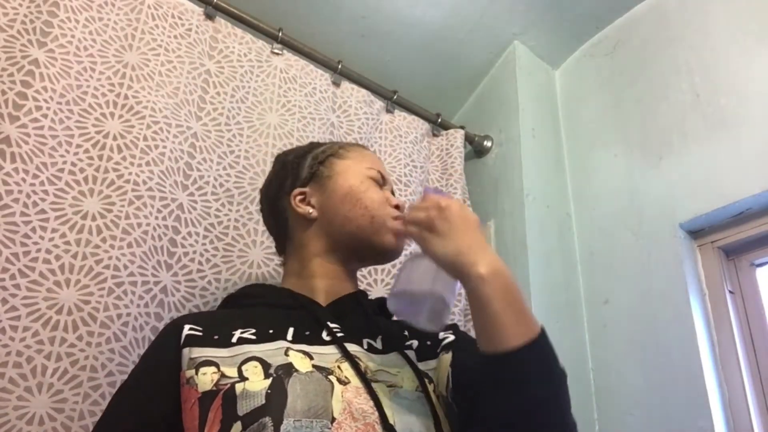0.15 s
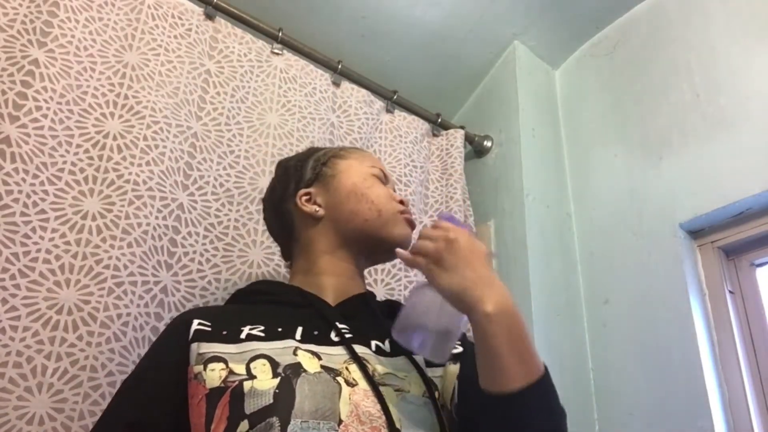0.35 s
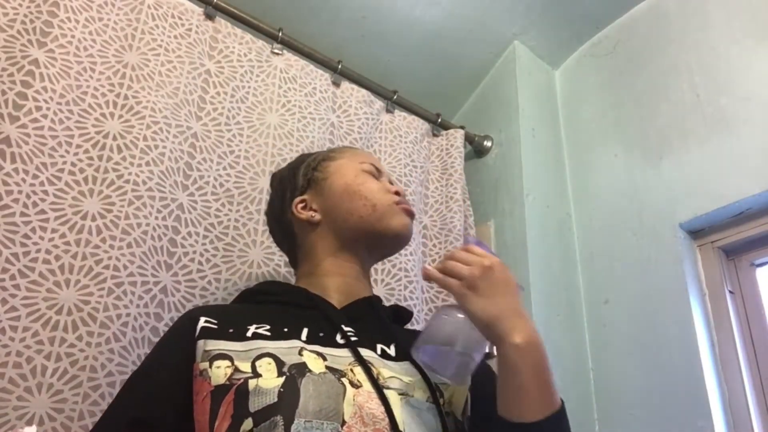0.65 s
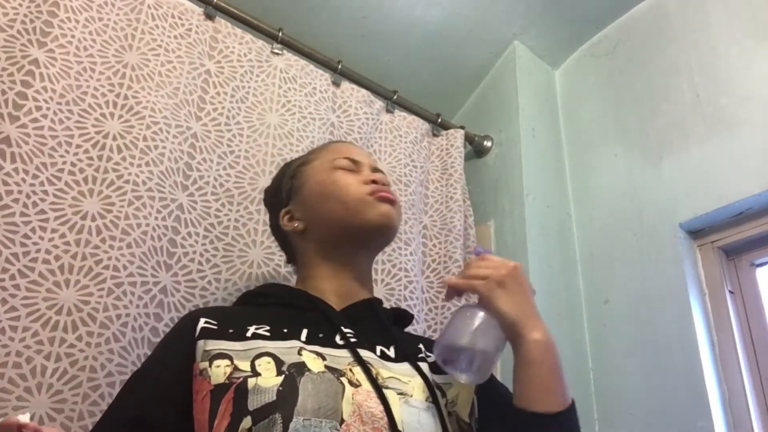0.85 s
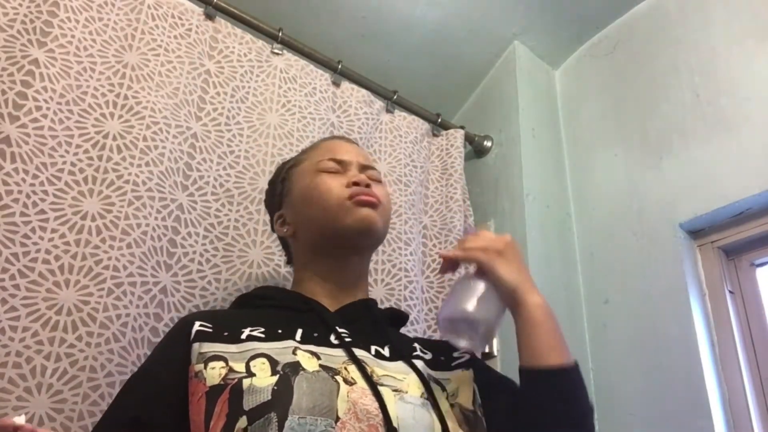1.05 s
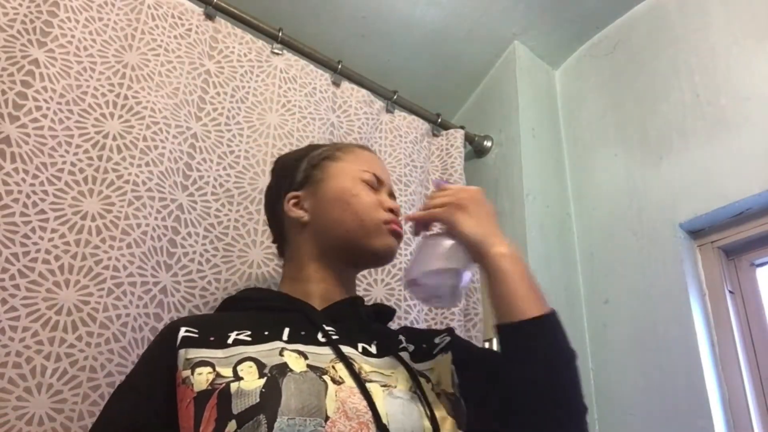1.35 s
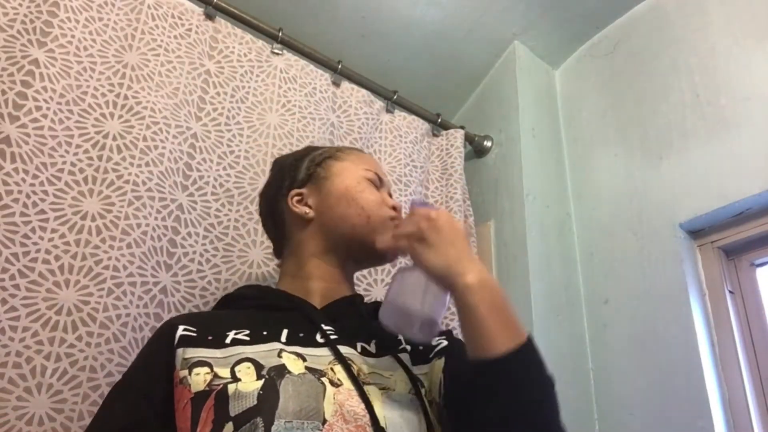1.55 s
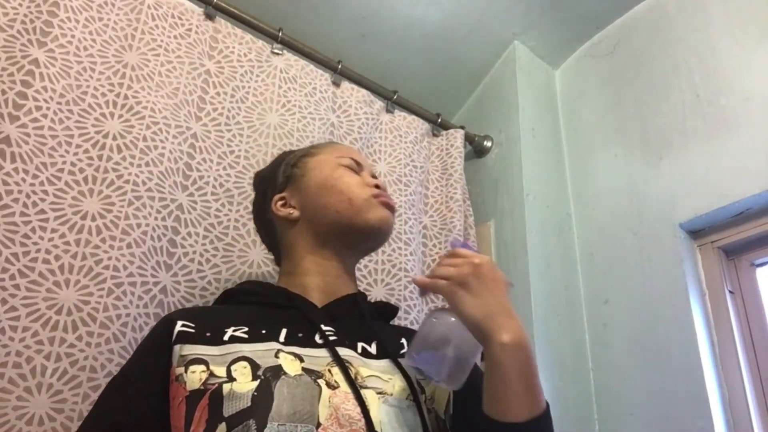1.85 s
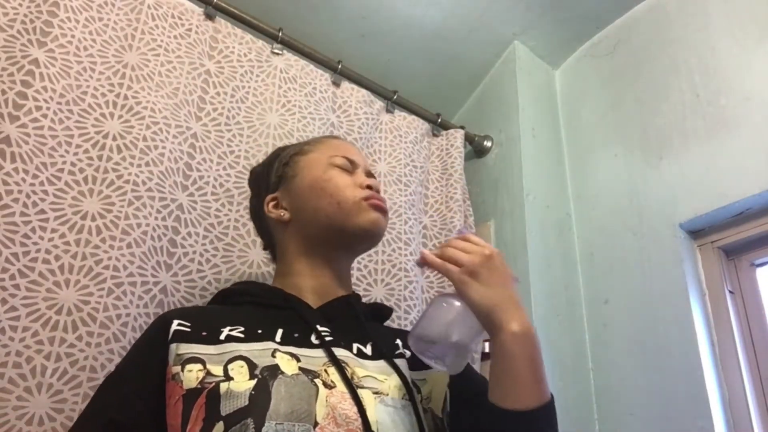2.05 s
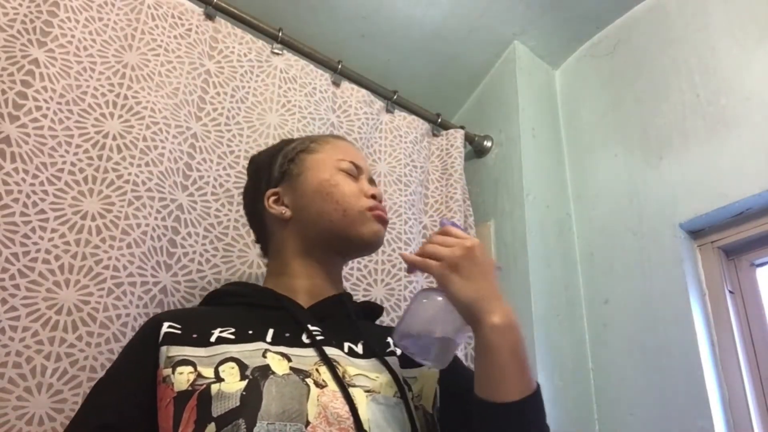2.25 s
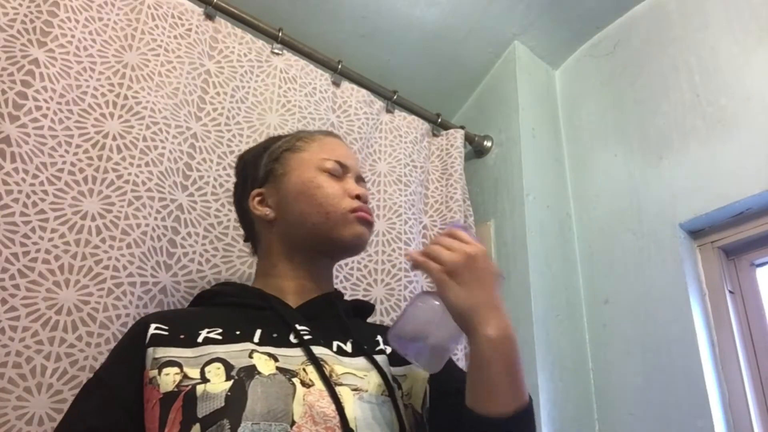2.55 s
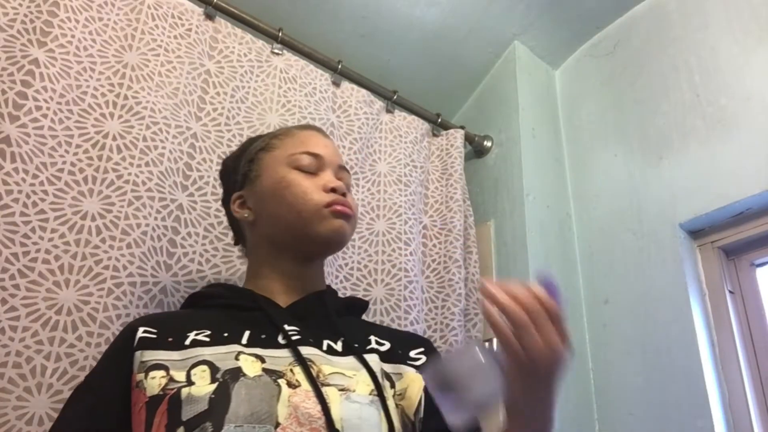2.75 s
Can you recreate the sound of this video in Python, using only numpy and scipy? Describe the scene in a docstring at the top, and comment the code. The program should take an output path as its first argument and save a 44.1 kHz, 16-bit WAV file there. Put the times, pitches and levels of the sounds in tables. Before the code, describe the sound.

Quick hisses of mist from a plastic spray bottle, its pump clacking between presses.

```python
"""A small plastic spray bottle clacks in a bathroom, then is pumped nine times, about 3.5 times a second.
Each press starts with a spit, most with a knock on the pump, and swells into a hiss of mist.
Some presses die with a sputter; on release the plunger clacks back and sucks up liquid.
Two soft hollow notes sound early on and one near the end.
All along, hard walls answer the bottle over a faint room hum."""
import sys
import numpy as np
from scipy import signal
from scipy.fft import rfft, irfft, next_fast_len
from scipy.io import wavfile
from scipy.ndimage import uniform_filter1d, map_coordinates

SR = 44100
rng = np.random.default_rng(int(sys.argv[2]) if len(sys.argv) > 2 else 0)


def master_out(mix):
    """Clip the mix to full scale and print it as 16-bit PCM to the path in sys.argv[1]."""
    frames = np.transpose(np.atleast_2d(mix))
    ceiling = np.clip(frames, -1, 1)
    pcm = np.round(ceiling * 32767).astype(np.int16)
    wavfile.write(sys.argv[1], SR, pcm)


N = 127890
TIME = np.arange(N) / SR


def spray():
    """Pressure swells and falls with each press: the mist follows it steeply, the liquid jet barely."""
    # The presses. Each row: start, time to full pressure and fall time, all in seconds,
    # then mist level in dB and extra treble in dB.
    presses = [(0.12, .085, 0.053, -38.5, -1), (0.392, 0.085, 0.076, -37.5, -1),
               (0.67, 0.087, 0.063, -36.5, -0.5), (0.954, 0.075, 0.063, -37, -2.5),
               (1.212, 0.081, .058, -37, -0.5), (1.488, 0.075, 0.062, -37, -3),
               (1.754, 0.095, 0.057, -37, -2), (2.039, 0.097, 0.05, -37, -1.5),
               (2.328, 0.088, 0.052, -38, -4.5)]
    # The tone of the mist and of the coarse jet. Each row: frequency in Hz, level in dB.
    mist_tone = [(200, -54), (500, -32), (900, -32), (1300, -10), (2000, -8), (3000, -1.5), (4000, -0.5),
                 (5000, -3), (6600, -0.5), (7600, -4.5), (11800, -8.5), (13600, -6), (16000, -15)]
    jet_tone = [(100, -35), (300, -23.5), (650, 4.5), (1000, -1.5), (1600, -1), (2500, 4.5), (5000, -23),
                (16000, -7.5)]
    start_db, end_db = 18.5, 13.5  # how far below its peak the mist starts, and is after the fall time
    treble_hz, treble_follows = 7800, 1.24  # fine mist needs more pressure
    jet_db, jet_follows, jet_stop_s = -20, 0.13, 0.004
    mist, fine_mist, jet = np.zeros((3, N))
    for start, rise, fall, db, treble_db in presses:
        t = TIME - start
        rise_left = np.clip(1 - t / rise, 0, 1)
        fall_done = np.maximum((t - rise) / fall, 0)
        swell_db = -start_db * rise_left ** 1.6 - end_db * fall_done ** 2.22
        valve = np.clip(t / 0.006, 0, 1)
        jet_stop = np.exp(-np.maximum(t - rise - fall, 0) / jet_stop_s)
        mist += valve * gain(db + swell_db)
        fine_mist += valve * gain(db + treble_db + treble_follows * swell_db)
        jet += valve * gain(db + jet_db + jet_follows * swell_db) * jet_stop
    hiss = noise(mist_tone, grain_db=2.0) * gain(0.2 * wobble(rate=140))
    treble = filtered(hiss, lambda hz: high_pass(hz, treble_hz))
    return mist * (hiss - treble) + fine_mist * treble + jet * noise(jet_tone, grain_db=3.5)


def spits():
    """The nozzle spits air and droplets as the valve opens or under a harder squeeze."""
    # The spits. Each row: start in seconds, burst level in dB, fizz level in dB,
    # attack in seconds, seconds to fade by 60 dB.
    events = [(0.119, -30, -38, .012, 0.087), (0.287, -36, -39.5, 0.0029, 0.08),
              (.390, -46.5, -60, 0.0011, 0.067), (0.67, -34.5, -48, 0.0013, 0.068),
              (0.765, -28.5, -55, 0.0052, 0.083), (.952, -44.5, -60, .002, 0.079),
              (1.213, -36, -43, 0.00075, 0.056), (1.487, -45.5, -52, 0.0056, 0.098),
              (1.755, -37, -47, .002, 0.073), (2.038, -37, -55, 0.0013, 0.066),
              (2.328, -39, -48, .001, 0.071)]
    # The tone of the burst and of its high fizz. Each row: frequency in Hz, level in dB.
    burst_tone = [(200, -31), (600, -3), (2000, -6), (4000, 1), (6500, 9), (9000, 2.5), (14000, 1),
                  (16000, -8)]
    fizz_tone = [(2000, -21), (6000, -42), (9000, 6), (11500, -2.5), (14000, 10), (16000, -5.5)]
    bursts = sum(gain(db) * struck(start, fade, attack) for start, db, _, attack, fade in events)
    fizz = sum(gain(db) * struck(start, fade, attack) for start, _, db, attack, fade in events)
    return noise(burst_tone, grain_db=3.5) * bursts + noise(fizz_tone, grain_db=4.5) * fizz


def sputters():
    """The last coarse drops sputter out as the pressure dies."""
    # The sputters. Each row: time of the peak in seconds, level in dB.
    events = [(.826, -42.5), (1.602, -62), (2.175, -69), (2.462, -61)]
    # Their dull tone. Each row: frequency in Hz, level in dB.
    tone = [(400, -32), (900, -14.5), (1400, -3), (2200, -0.5), (4000, -7), (12000, -27)]
    return noise(tone) * sum(gain(db) * puff(peak, width_s=0.0059) for peak, db in events)


def finger_knocks():
    """The finger knocks the pump head: a click, and a hollow thud from the bottle."""
    # The knocks. Each row: start in seconds, click level in dB, thud level in dB.
    knocks = [(.390, -36, -47.5), (.669, -34, -46.5), (.952, -48, -53), (1.213, -40, -46.5),
              (1.755, -36, -51.5), (2.039, -40.5, -55), (2.328, -36.5, -55)]
    # The tone of the click. Each row: frequency in Hz, level in dB.
    click_tone = [(100, -33), (300, -36), (600, 7), (900, -6.5), (1600, 3.5), (3200, 6.5), (5000, -4),
                  (12000, -38)]
    # The bottle's low ringing notes. Each row: pitch in Hz, level in dB, seconds to fade by 60 dB.
    thud_notes = [(348, -12.5, 0.06), (416, -0.5, 0.071), (527, -9.5, 0.047)]
    clicks = noise(click_tone) * sum(gain(db) * struck(start, fade_s=0.043) for start, db, _ in knocks)
    thuds = sum(gain(db) * ringing(start, thud_notes) for start, _, db in knocks)
    return clicks + thuds


def plunger():
    """The plunger springs back with a clack that rings the bottle, then sucks up liquid."""
    # The returns. Each row: start in seconds, clack level in dB, suction level in dB.
    returns = [(-.020, -28, -52.5), (.036, -37.5, -51.5), (.315, -34.5, -75), (.589, -35, -49),
               (.879, -35.5, -60), (1.144, -36, -66), (1.407, -35, -53), (1.678, -34.5, -49.5),
               (1.968, -34.5, -50.5), (2.259, -33, -49.5), (2.556, -35, -51)]
    # The tone of the clack and of the suction. Each row: frequency in Hz, level in dB.
    clack_tone = [(150, -63), (300, -33.5), (600, -9), (850, -18.5), (1500, -7.5), (2000, -5.5), (2860, -3),
                  (4000, -1.5), (4700, -10.5), (6600, -6), (7600, -15), (12300, -21.5), (16000, -43)]
    suction_tone = [(200, -29.5), (600, 0), (1000, -8), (1600, -2), (3500, -7), (6500, 8), (8000, -3),
                    (12000, -8), (16000, -20)]
    # The ring of bottle and pump. Each row: pitch in Hz, level in dB, seconds to fade by 60 dB.
    bottle_notes = [(604, -17.5, 0.19), (1591, -3.5, 0.084), (2190, -1.5, 0.048), (2810, -9, 0.16),
                    (3310, -3.5, 0.045), (3640, -9, 0.046), (3972, -2, 0.084)]
    ring_db, suck_delay_s = -14.5, 0.025
    hits = sum(gain(db) * struck(start, fade_s=0.053, attack_s=0.0011) for start, db, _ in returns)
    clacks = noise(clack_tone) * hits
    ring = sum(gain(db + ring_db) * ringing(start, bottle_notes) for start, db, _ in returns)
    sucks = sum(gain(db) * puff(start + suck_delay_s, width_s=0.015) for start, _, db in returns)
    return clacks + ring + noise(suction_tone, grain_db=4.5) * sucks


def hollow_notes():
    """Soft hollow notes swell and die; the two deeper ones start with a dull bump."""
    # The notes. Each row: start in seconds, pitch in Hz, level in dB, rise in seconds,
    # seconds to fade by 60 dB.
    notes = [(.112, 602, -49.5, 0.015, 0.11), (0.414, 282.5, -33.5, .038, .2),
             (2.408, 292, -48, 0.028, 0.16)]
    # The bumps. Each row: start in seconds, level in dB.
    bumps = [(.388, -51), (2.408, -45)]
    # The tone of a bump. Each row: frequency in Hz, level in dB.
    bump_tone = [(60, -40), (150, -8.5), (230, -1.5), (310, -7), (420, -11), (1000, -69)]
    hits = sum(gain(db) * struck(start, fade_s=0.22, attack_s=0.009) for start, db in bumps)
    sound = noise(bump_tone) * hits
    for start, hz, db, rise, fade in notes:
        t = TIME - start
        swell = np.clip(t / rise, 0, 1) * fading(t - rise, fade)
        sound += gain(db) * swell * np.sin(2 * np.pi * hz * t)
    return sound


def bathroom(sound):
    """The walls echo the sound: a little of the echo stays the same, the rest changes as the bottle moves."""
    step_s, steady_share = 0.06, 0.04
    echoes = np.sqrt(steady_share) * signal.fftconvolve(sound, wall_echo())[:N]
    for middle in np.arange(0, N / SR, step_s):  # each overlapping slice gets an echo of its own
        first, last = max(int((middle - step_s) * SR), 0), int((middle + step_s) * SR)
        window = np.cos(np.pi / 2 * (TIME[first:last] - middle) / step_s)
        echo = signal.fftconvolve(sound[first:last] * window, wall_echo())[:N - first]
        echoes[first:first + len(echo)] += np.sqrt(1 - steady_share) * echo
    return echoes


def wall_echo():
    """Hard walls answer a click with a short, dense echo whose treble dies first."""
    # How long the room rings. Each row: frequency in Hz, seconds to fade by 60 dB.
    fade_times = [(200, 0.24), (1200, 0.26), (3000, 0.17), (7000, 0.15), (11000, 0.16), (15000, 0.15)]
    hz, t, bands = signal.stft(rng.standard_normal(SR // 2), SR, nperseg=256)
    faded = bands * fading(t, value_at(fade_times, hz)[:, None])
    echo = signal.istft(faded, SR, nperseg=256)[1]
    echo *= np.clip(np.arange(len(echo)) / SR / 0.0037, 0, 1)  # builds up over 3.7 ms
    return echo / np.linalg.norm(echo)


def background():
    """Faint room noise with a hum that wavers in level and pitch."""
    # The tone of the room noise. Each row: frequency in Hz, level in dB.
    room_tone = [(25, -50), (100, -29.5), (140, -12), (250, -8), (330, -14), (440, -20.5), (1300, -24),
                 (5000, -27.5), (13000, -34), (16000, -34)]
    # The notes of the hum. Each row: start in seconds, pitch in Hz, level in dB.
    hum_notes = [(-.1, 146, -75.5), (-.1, 184, -87), (2.69, 251.5, -66.5)]
    noise_db, waver_db, fade_in_s = -68.5, 2, 0.02
    hum = np.zeros(N)
    for start, hz, db in hum_notes:
        fade_in = np.clip((TIME - start) / fade_in_s, 0, 1)
        level = gain(db + waver_db * wobble(rate=6.2))
        hum += fade_in * level * np.sin(2 * np.pi * hz * TIME + 0.52 * wobble(rate=12))
    return gain(noise_db) * noise(room_tone) + hum


def ringing(start, notes):
    """Struck plastic rings at its own notes, a little different in level and pitch each time."""
    sound = np.zeros(N)
    for hz, db, fade in notes:
        louder, higher = rng.standard_normal(2)
        wave = np.sin(2 * np.pi * hz * (1 + 0.0061 * higher) * (TIME - start))
        sound += gain(db + 2 * louder) * struck(start, fade) * wave
    return sound


def noise(tone, grain_db=None):
    """Noise of the given tone at a standard level; grain_db breaks it into a steady flow of droplets."""
    white = rng.standard_normal(N)
    if grain_db is not None:
        drops = gain(grain_db * wobble(rate=1500))
        flow = np.sqrt(np.abs(uniform_filter1d(drops ** 2, size=500)))
        white = white * drops / flow
    shaped = filtered(white, lambda hz: gain(value_at(tone, hz)))
    return shaped / np.sqrt(np.mean(shaped ** 2) + 1e-20)


def struck(start, fade_s, attack_s=0.0007):
    """The loudness of a hit: a quick rise, then a fade."""
    t = np.maximum(TIME - start, 0)
    return (1 - np.exp(-t / attack_s)) * fading(t, fade_s)


def fading(t, fade_s):
    """Stays at 1 until t is zero, then drops by 60 dB every fade_s seconds."""
    return np.exp(-np.log(1000) * np.maximum(t, 0) / fade_s)


def puff(peak_s, width_s):
    """A smooth rise and fall in loudness around peak_s."""
    return np.exp(-((TIME - peak_s) / width_s) ** 2)


def wobble(rate):
    """A smooth curve through random points, rate of them a second."""
    return map_coordinates(rng.standard_normal(int(N * rate / SR) + 4), [TIME * rate])


def filtered(sound, response):
    """Turn each frequency up or down by the factor response(hz)."""
    size = next_fast_len(N + 8192)
    return irfft(rfft(sound, size) * response(np.fft.rfftfreq(size, 1 / SR)), size)[:N]


def high_pass(hz, cut_hz):
    """A factor near 0 well below cut_hz and near 1 well above it."""
    return 1 - 1 / (1 + (hz / cut_hz) ** 4)


def value_at(table, hz):
    """Read between a table's rows, with frequency counted in octaves."""
    frequencies, values = np.transpose(table)
    return np.interp(np.log(hz + 1), np.log(frequencies + 1), values)


def gain(db):
    """Turn decibels into a factor to multiply by."""
    return 10 ** (np.asarray(db) / 20)


def scene():
    """The bottle and its echo, the hollow notes and the background, in one channel."""
    direct_db, echo_db = -1.5, -0.5
    bottle = spray() + spits() + sputters() + finger_knocks() + plunger()
    in_room = gain(direct_db) * bottle + gain(echo_db) * bathroom(bottle)
    return (in_room + hollow_notes() + background())[None]


def record(dry):
    """Cut away the deep bass and the very highest treble."""
    low_cut_hz, top_hz = 58, 16150
    return filtered(dry[0], lambda hz: (hz < top_hz) * high_pass(hz, low_cut_hz))[None]


dry = scene()
out = record(dry)
master_out(out)
```